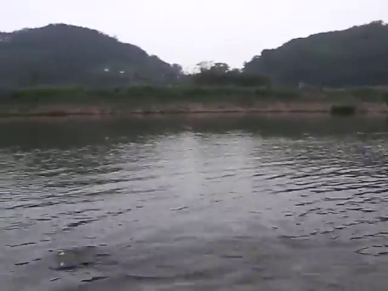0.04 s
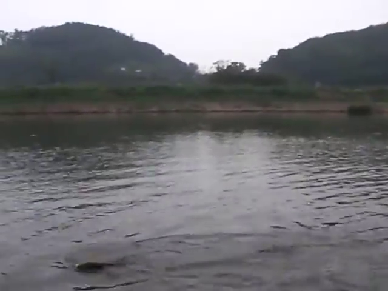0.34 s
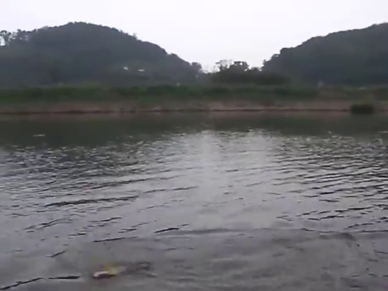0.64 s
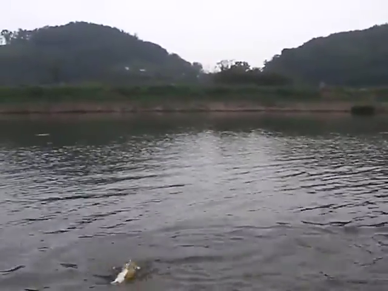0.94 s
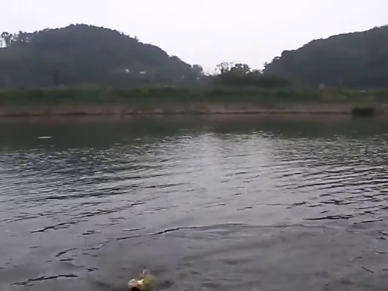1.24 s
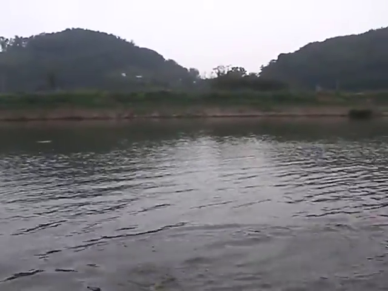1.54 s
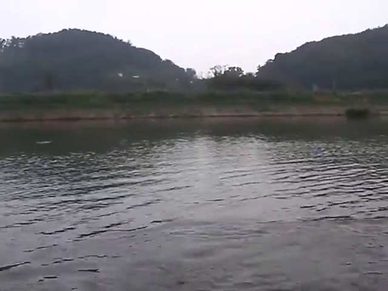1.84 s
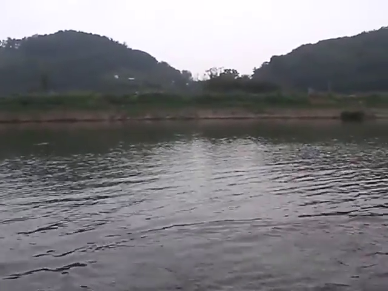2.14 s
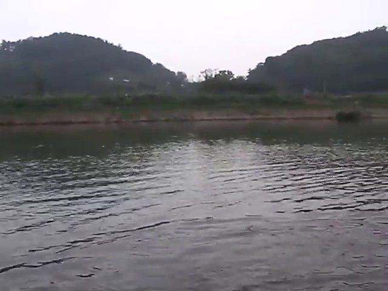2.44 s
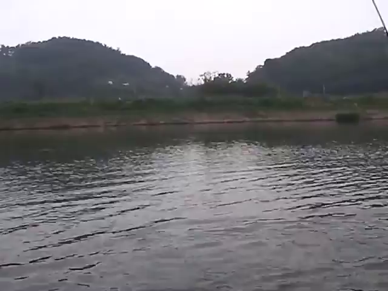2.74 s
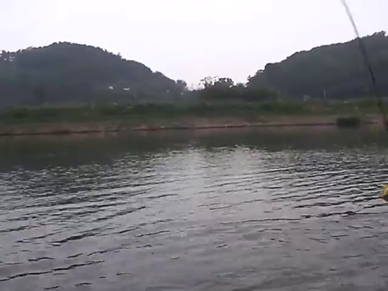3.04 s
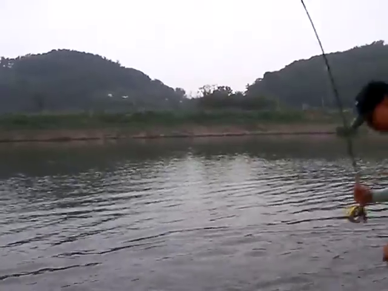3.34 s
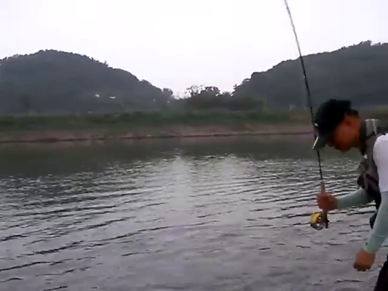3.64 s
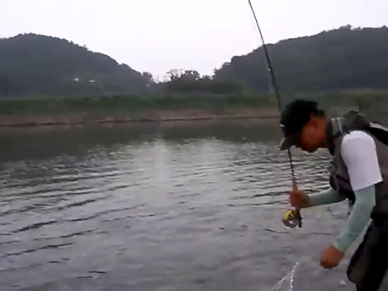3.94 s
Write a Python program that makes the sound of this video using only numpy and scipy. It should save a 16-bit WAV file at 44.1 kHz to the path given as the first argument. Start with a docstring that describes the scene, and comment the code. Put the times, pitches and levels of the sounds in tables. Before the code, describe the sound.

Water splashes close by in a shallow river. For the first 1.5 seconds there is only light lapping and a few drips as a fish stirs. From about 1.6 seconds, uneven sloshing and fizzy spray surge up, with plinking drops and small sharp slaps. From 2.8 to 4 seconds the splashing is loudest, with hollow gulps as an angler wades. A low river wash and faint hiss continue throughout.

```python
"""Hooked fish in the shallows

A fish stirs a calm river while an angler wades in close by. The water sloshes, sprays and fizzes
in surges of noise and ringing bubbles. Drops plink back, air pockets gulp and churn around the legs,
and small knocks cut through. Behind it lie low river wash, microphone hiss, a trickle and a hum."""
import sys
import numpy as np
from scipy import signal
from scipy.fft import rfft, irfft
from scipy.io import wavfile
from scipy.ndimage import uniform_filter1d

SR = 44100
rng = np.random.default_rng(int(sys.argv[2]) if len(sys.argv) > 2 else 0)


def master_out(mix):
    """Clip the mix to full scale and print it as 16-bit PCM to the path in sys.argv[1]."""
    frames = np.transpose(np.atleast_2d(mix))
    ceiling = np.clip(frames, -1, 1)
    pcm = np.round(ceiling * 32767).astype(np.int16)
    wavfile.write(sys.argv[1], SR, pcm)


N = 176400
TIME, FREQ = np.arange(N) / SR, np.fft.rfftfreq(N, 1 / SR)

# How hard the water is stirred, as three fader rides: time_s, slosh_db, spray_db, fizz_db
STIR_FADERS = [(0, -57.5, -61, -61), (0.4, -52.5, -58.5, -73), (1.25, -62.5, -62.5, -68),
               (1.45, -62, -58, -59), (1.58, -48.5, -54.5, -52), (1.76, -60, -47.5, -47.5),
               (1.83, -44.5, -45, -46), (1.92, -45.5, -42.5, -45), (2.02, -42.5, -44.5, -44.5),
               (2.15, -49.5, -47, -50.5), (2.21, -50, -45.5, -47.5), (2.38, -61, -52.5, -53.5),
               (2.45, -47.5, -46, -47), (2.51, -57, -48, -51.5), (2.58, -44, -45, -41.5),
               (2.73, -43.5, -44, -47), (2.83, -39.5, -37.5, -38.5), (2.92, -48.5, -42.5, -47),
               (3.0, -40.5, -38.5, -42.5), (3.08, -40.5, -39.5, -40.5), (3.14, -43, -37.5, -43.5),
               (3.2, -41, -43, -43), (3.31, -42.5, -34.5, -37), (3.42, -47, -43.5, -48.5),
               (3.54, -49.5, -44, -45.5), (3.64, -50, -42.5, -46.5), (3.72, -41, -36, -40.5),
               (3.81, -48, -40, -41), (3.87, -49.5, -42.5, -44), (4.0, -48, -46, -46)]
# Drops and small bubbles: start_s, level_db, pitch_hz, decay_ms
DROP_CUES = [(.6035, -38, 2710, 0.39), (.6207, -38.5, 3400, .8), (.7716, -41.5, 1120, 2.1),
             (1.0095, -44.5, 2270, 5), (1.143, -46.5, 1070, 3), (1.372, -39, 3310, 0.99),
             (1.61, -45.5, 1970, 2.3), (1.638, -33, 1770, 1.8), (1.7288, -12, 6600, 0.57),
             (1.7945, -27, 2580, 1.7), (1.8752, -23.5, 6770, 0.84), (1.9822, -21, 4220, 1.6),
             (1.995, -36, 1255, 2.8), (2.0143, -39, 1190, 2), (2.037, -31, 5050, 1.7),
             (2.0675, -35.5, 730, 1.7), (2.110, -44, 1330, 3.7), (2.1885, -28, 6900, 1.2),
             (2.259, -29.5, 5500, 1), (2.260, -39.5, 1680, 3.3), (2.348, -44, 1770, 2.3),
             (2.437, -41, 1570, 3.4), (2.452, -35, 3370, 1.9), (2.6094, -27, 5640, 1.3),
             (2.624, -32, 1406, 3.7), (2.640, -37.5, 740, 2.1), (2.703, -35, 1600, 3.7),
             (2.7998, -21, 5770, 0.66), (2.8198, -24, 2760, 0.9), (2.824, -23, 4460, 0.3),
             (2.838, -34, 2010, 3), (3.271, -32.5, 1604, 4.3), (3.3035, -29.5, 1640, 3.7),
             (3.4998, -24, 2710, 0.8), (3.513, -38, 1720, 2.7), (3.5235, -30.5, 1860, 2.2),
             (3.5536, -32.5, 3300, 1.1), (3.6726, -19.5, 6650, 1.1), (3.680, -25, 4150, 2.5),
             (3.688, -23.5, 2610, 0.31), (3.8735, -37, 1900, 1.8), (3.883, -36, 1200, 2.1),
             (3.909, -28.5, 2730, 0.63), (3.9415, -37, 4050, 1.2)]
# Large air pockets closing: start_s, level_db, pitch_hz, decay_ms
GULP_CUES = [(2.99, -42, 167, 14), (3.076, -34.5, 323, 2.7), (3.116, -32.5, 434, 11),
             (3.183, -38, 530, 7.7), (3.225, -37.5, 440, 11), (3.335, -41, 555, 9.3),
             (3.707, -28.5, 970, 3.3), (3.733, -23.5, 583, 4.6), (3.754, -26.5, 1090, 3.8),
             (3.751, -39, 586, 7.1), (3.7865, -30, 548, 5.1), (3.82, -30, 760, 2.6)]
# Small sharp knocks and slaps: start_s, level_db, centre_hz
KNOCK_CUES = [(0.621, -29.5, 2020), (0.7711, -29, 4670), (0.8392, -38.5, 2800), (1.137, -37, 9000),
              (1.3715, -34, 5030), (1.637, -35, 5000), (1.728, -28, 9000), (1.7937, -21, 6000),
              (1.799, -22, 8900), (1.986, -20.5, 9000), (2.208, -29, 3000), (2.2112, -28, 7000),
              (2.5705, -24.5, 6500), (2.782, -24, 4500), (2.8206, -18, 3520), (2.8287, -21, 5000),
              (3.252, -25, 6000), (3.561, -32, 5000), (3.5668, -22, 7000), (3.6879, -20.5, 2520),
              (3.742, -21, 2400), (3.7802, -21.5, 5000), (3.813, -26, 10000), (3.8232, -21, 10000),
              (3.9522, -22, 7100)]
# Hollow churning where a body pushes water aside: start_s, length_s, level_db, pitch_hz
CHURN_CUES = [(1.856, 0.023, -42.5, 2960), (1.883, 0.067, -46, 516), (1.99, 0.039, -39.5, 1230),
              (2.985, .12, -52, 176), (3.074, .12, -45.5, 415), (3.207, 0.083, -45, 460),
              (3.512, 0.026, -38, 1860), (3.702, 0.094, -39.5, 1050), (3.745, 0.1, -40.5, 640)]
# Tone of each splash layer: frequency_hz, gain_db
SLOSH_EQ = [(60, -25), (200, -7.5), (330, -4.5), (500, 2.5), (800, 1.5), (1300, -1), (2000, -2.5),
            (4000, -19), (16000, -50)]
SPRAY_EQ = [(300, -21), (1200, -0.5), (2200, -3), (4000, -2), (5800, -1.5), (6900, 0.5), (8000, -6),
            (9500, -27)]
FIZZ_EQ = [(6000, -33), (8400, -6.5), (10000, 3.5), (13000, 0), (14300, -2.5), (15500, -25)]
# Low river wash and hiss, with microphone colour as bumps in the treble: frequency_hz, gain_db
BACKGROUND_EQ = [(25, -12), (45, -14), (65, -5.5), (120, 0.5), (200, -0.5), (340, 1), (600, -1), (1100, -2),
                 (1900, -15), (2900, -10), (3700, -5.5), (5200, -4.5), (6000, -11.5), (6800, -2),
                 (7600, -15), (10000, -11), (13500, -15), (16000, -26)]
# Stereo image, as the likeness of left and right: frequency_hz, coherence
SPLASH_IMAGE = [(100, 0.97), (1300, 0.95), (2400, 1), (4400, 0.83), (8000, 0.74), (15000, 0.4)]
BACKGROUND_IMAGE = [(25, .7), (70, 0.89), (640, 0.88), (1400, 0.61), (3100, 0.24), (6800, 0.076),
                    (15000, -0.57)]
# Narrow cuts in the whole mix: centre_hz, width_hz
MIX_NOTCHES = [(240, 48.8), (7950, 770)]


def splashing():
    """Stirred water: a slosh full of bubbles, a spray full of droplets and a fine fizz on top."""
    swash = patchy_noise(patch_db=4.5, flicker_db=3, hold_frames=10)
    bubbles = bubble_swarm(337.5, 2730, per_s=420, ring_cycles=4.8, spread_db=3, sizes=36)
    hiss = patchy_noise(patch_db=1.5, flicker_db=3.02, hold_frames=6)
    droplets = bubble_swarm(1782, 12960, per_s=900, ring_cycles=5.7, spread_db=3, sizes=36)
    slosh = amp(-3.5) * unit(eq(swash, SLOSH_EQ)) + amp(-9) * unit(eq(bubbles, SLOSH_EQ))
    spray = amp(-1.5) * unit(eq(hiss, SPRAY_EQ)) + amp(-4) * unit(eq(droplets, SPRAY_EQ))
    fizz = amp(-0.5) * unit(eq(hiss, FIZZ_EQ)) + amp(-5) * unit(eq(droplets, FIZZ_EQ))
    time_s, *faders_db = np.transpose(STIR_FADERS)
    gains = [amp(np.interp(TIME, time_s, fader_db)) for fader_db in faders_db]
    water = sum(gain * layer for gain, layer in zip(gains, (slosh, spray, fizz)))
    return widen(water, SPLASH_IMAGE) / np.sqrt(2)


def drops_and_gulps(spatter_gain=0.65):
    """Falling drops and closing air pockets: each a bubble's ring with a puff of spatter."""
    rings, spatter = np.zeros((2, 2, N))
    t = np.arange(4096) / SR
    for cues, onset_cycles in ((DROP_CUES, 2.8), (GULP_CUES, 1.3)):
        for start_s, level_db, hz, decay_ms in cues:
            decay_s = decay_ms / 1000
            phase = rng.uniform(-1, 1) * hz / 12000  # nudges each ring off centre
            ring = np.array([bubble(hz, decay_s, onset_cycles, side * phase) for side in (1, -1)])
            add(rings, start_s, amp(level_db) * ring)
            puff = np.minimum(t * hz / onset_cycles, 1) * np.exp(-t / (0.87 * decay_s))
            add(spatter, start_s, amp(level_db) * puff * noise_band(len(t), hz, width=0.62))
    return rings + spatter_gain * widen(spatter, SPLASH_IMAGE) / 2


def knocks(attack_s=0.00083, decay_s=0.00075):
    """Small knocks and slaps: very short, broad cracks of noise."""
    out = np.zeros((2, N))
    t = np.arange(512) / SR
    envelope = np.minimum(t / attack_s, 1) * np.exp(-t / decay_s)
    for start_s, level_db, hz in KNOCK_CUES:
        crack = envelope * noise_band(len(t), hz, width=0.82)
        add(out, start_s, amp(level_db) * crack / abs(crack).max(1, keepdims=True))
    return widen(out, SPLASH_IMAGE)


def churning(attack_s=0.0076):
    """Pockets of air and water rumble briefly around one pitch."""
    out = np.zeros((2, N))
    for start_s, length_s, level_db, hz in CHURN_CUES:
        t = np.arange(0, length_s, 1 / SR)
        envelope = np.minimum(t / attack_s, 1) * np.sqrt(1 - (t / length_s) ** 2)
        rumble = unit(noise_band(16384, hz, width=0.26)[:, :len(t)])
        add(out, start_s, amp(level_db) * envelope * rumble)
    return widen(out, SPLASH_IMAGE) / np.sqrt(2)


def reflections(sound, predelay_s=0.001, decay_s=0.0079):
    """A tight tail of sound bouncing off water, bank and angler."""
    t = np.arange(4000) / SR
    tail = rng.standard_normal((2, len(t))) * np.exp(-t / decay_s) * (t > predelay_s)
    tail /= np.linalg.norm(tail[0])
    wet = signal.oaconvolve(sound.mean(0)[None], tail, axes=1)[:, :N]
    return widen(wet, SPLASH_IMAGE) / np.sqrt(2)


def river_and_hiss():
    """Steady background of low river wash and microphone hiss."""
    noise = patchy_noise(patch_db=1.6, flicker_db=0.4, hold_frames=16)
    return unit(widen(eq(noise, BACKGROUND_EQ), BACKGROUND_IMAGE))


def hum(pitch_hz=86, waver_hz=7.2):
    """A low tone whose pitch wavers quickly at random."""
    wavering_hz = pitch_hz + waver_hz * noise_band(N, hz=25, width=0.87)[0]
    return unit(np.sin(2 * np.pi * np.cumsum(wavering_hz) / SR))


def trickle():
    """Drips along the bank, each ringing as a tiny bubble."""
    drips = bubble_swarm(1520, 4730, per_s=45, ring_cycles=8.5, spread_db=5, sizes=20)
    return unit(widen(drips, SPLASH_IMAGE))


def bubble(hz, decay_s, onset_cycles, phase=0, rise_per_decay=0.021):
    """A dying sine whose pitch rises as the bubble nears the surface."""
    t = np.arange(0, 7 * decay_s, 1 / SR)
    envelope = (1 - np.exp(-(t * hz / onset_cycles) ** 2)) * np.exp(-t / decay_s)
    cycles = hz * t * (1 + rise_per_decay * t / decay_s / 2)
    return envelope / envelope.max() * np.sin(2 * np.pi * cycles + phase)


def bubble_swarm(low_hz, high_hz, per_s, ring_cycles, spread_db, sizes):
    """Two random showers of bubbles, one pitch for each bubble size."""
    out = np.zeros((2, N))
    for hz in np.geomspace(low_hz, high_hz, sizes):
        decay_s = ring_cycles * rng.uniform(0.62, 2.1) / hz
        grain = unit(bubble(hz, decay_s, onset_cycles=0.59))
        grain *= np.sqrt(hz / len(grain))  # keeps the shower's spectrum flat
        for side in out:
            gaps, accents = rng.exponential(1, (300, 2)).T
            for start_s, accent in zip(np.cumsum(gaps) * sizes / per_s, np.minimum(accents, 3.5)):
                if start_s < N / SR:
                    add(side, start_s, amp(spread_db * accent) * grain)
    return out


def patchy_noise(patch_db, flicker_db, hold_frames):
    """Two noises, mottled in time and frequency, with a flicker shared by all bands."""
    spectra = signal.stft(rng.standard_normal((2, N)), nperseg=256, noverlap=192)[2]
    patches = uniform_filter1d(rng.standard_normal(spectra.shape[1:]), 5, axis=0)
    patches = unit(uniform_filter1d(patches, hold_frames, axis=1))
    flicker = unit(uniform_filter1d(rng.standard_normal(spectra.shape[2]), hold_frames))
    spectra *= amp(patch_db * patches + flicker_db * flicker)
    return signal.istft(spectra, nperseg=256, noverlap=192)[1][:, :N]


def noise_band(samples, hz, width):
    """Two unrelated noises in a resonance; width is a share of the pitch."""
    f = np.fft.rfftfreq(samples, 1 / SR)
    resonance = 1 / (1 + (np.log((f + 1) / hz) / width) ** 2)
    return unit(irfft(rfft(rng.standard_normal((2, samples))) * resonance, samples))


def widen(pair, image):
    """Turns two unrelated signals into left and right of a given likeness."""
    coherence = np.clip(curve(image), -0.99, 0.99)
    mid, side = irfft(rfft(pair) * np.sqrt([1 + coherence, 1 - coherence]), N)
    return np.array([mid + side, mid - side])


def eq(sound, points):
    """Shapes the tone with an EQ curve."""
    return irfft(rfft(sound) * amp(curve(points)), N)


def curve(points):
    """Joins breakpoints on a log-frequency axis."""
    hz, values = np.transpose(points)
    return np.interp(np.log(FREQ + 1), np.log(hz), values)


def add(mix, start_s, sound):
    """Mixes a sound in at its cue."""
    part = mix[..., round(start_s * SR):][..., :sound.shape[-1]]
    part += sound[..., :part.shape[-1]]


def amp(db):
    """Decibels to gain."""
    return 10 ** (np.asarray(db) / 20)


def unit(x):
    """Scales to rms 1."""
    return x / np.sqrt(np.mean(x ** 2) + 1e-20)


def scene():
    """Splashing, churning and close hits with their reflections, over a quiet ambience."""
    hits = drops_and_gulps() + knocks()
    ambience = amp(-49.5) * river_and_hiss() + amp(-64.5) * hum() + amp(-66.5) * trickle()
    return splashing() + churning() + hits + amp(-9) * reflections(hits) + ambience


def record(dry, notch_depth=0.75, high_cut_hz=15150):
    """Master EQ: two notches and a steep high cut."""
    notches = [1 - notch_depth * np.exp(-abs(2 * (FREQ - hz) / width_hz) ** 3)
               for hz, width_hz in MIX_NOTCHES]
    notched = irfft(rfft(dry) * np.prod(notches, axis=0), N)
    high_cut = signal.firwin(255, high_cut_hz, window=("kaiser", 9), fs=SR)
    return signal.oaconvolve(notched, high_cut[None], "same")


dry = scene()
out = record(dry)
master_out(out)
```